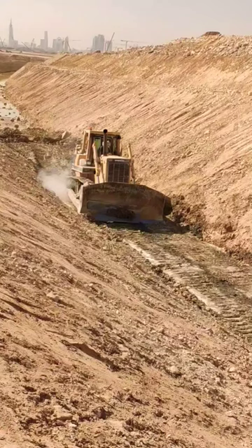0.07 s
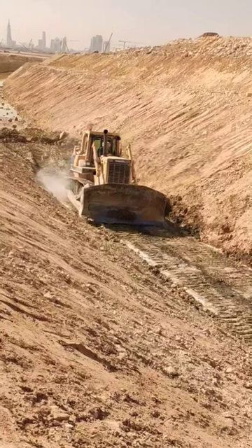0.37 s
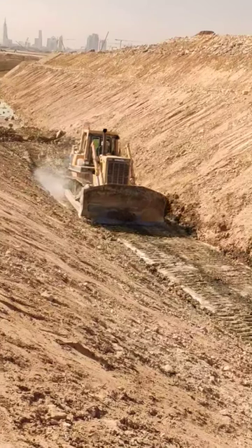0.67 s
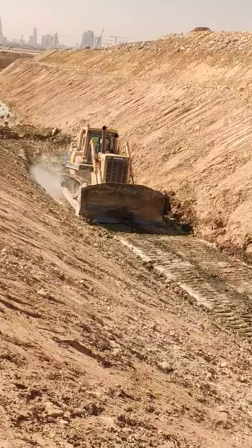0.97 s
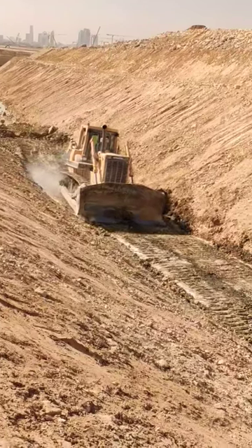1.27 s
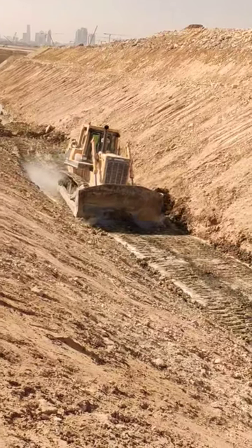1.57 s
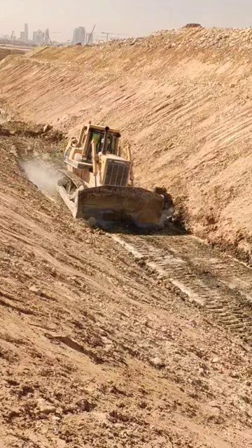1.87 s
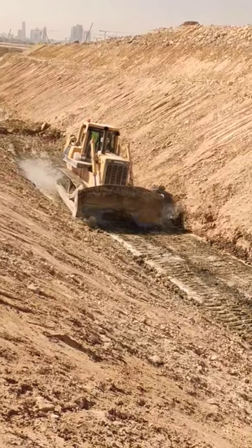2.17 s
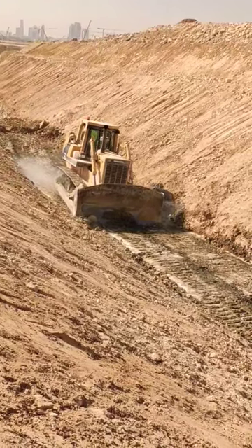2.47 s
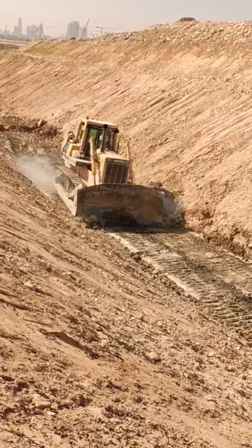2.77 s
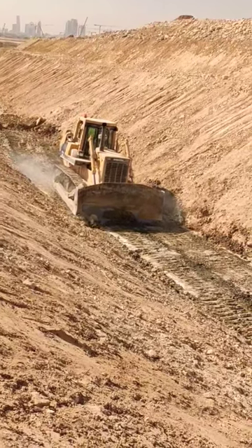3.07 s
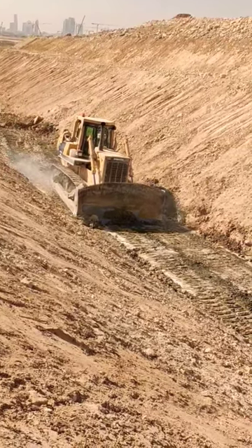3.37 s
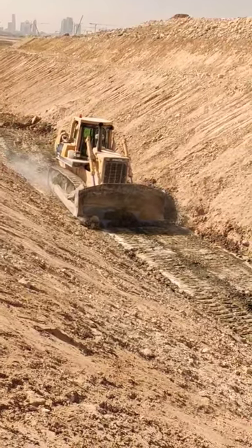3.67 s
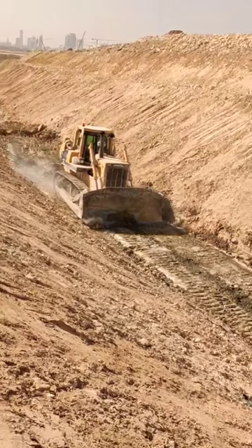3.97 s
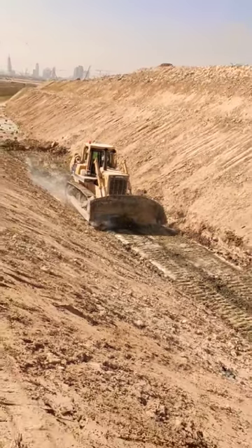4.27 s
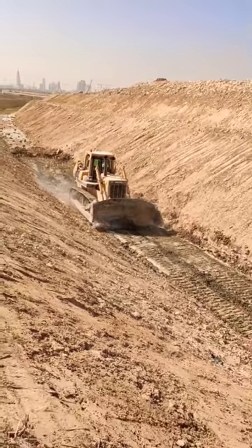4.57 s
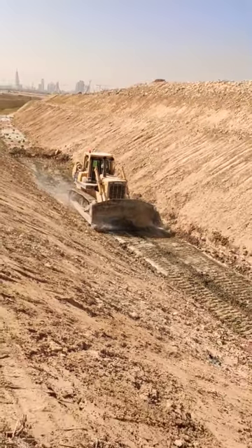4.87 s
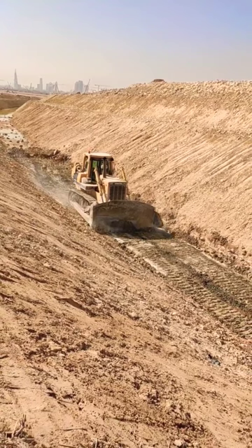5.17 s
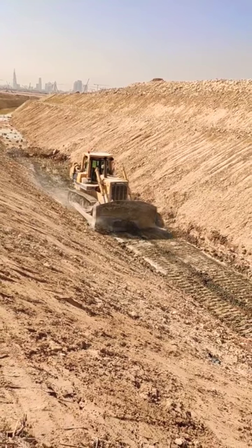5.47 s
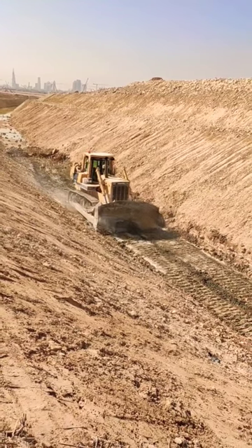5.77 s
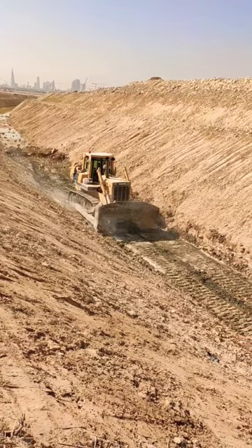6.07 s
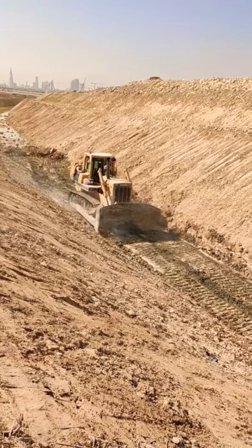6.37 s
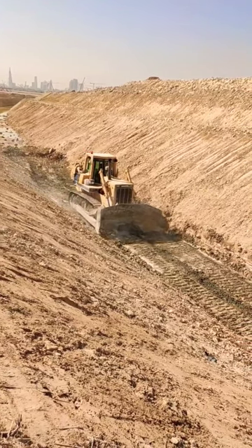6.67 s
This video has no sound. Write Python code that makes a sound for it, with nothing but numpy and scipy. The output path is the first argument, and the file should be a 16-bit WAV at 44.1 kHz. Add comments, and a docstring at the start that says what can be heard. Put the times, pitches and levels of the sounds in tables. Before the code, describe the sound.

Wind buffets the microphone outdoors as a bulldozer rumbles and rattles some way off, pushing sand with a faint hiss.

```python
"""Bulldozer from a windy bank

Some way off, heard from the bank above, a bulldozer pushes sand along a trench. Its diesel drones and
clatters, sagging under load; the steel tracks rattle, sing and crunch, earth thuds on the blade and sand
hisses off it. Up close, gusts rumble and pop on the two microphone ports, mostly the left one."""
import sys
import numpy as np
from scipy import signal
from scipy.fft import rfft, irfft, next_fast_len
from scipy.io import wavfile
from scipy.ndimage import uniform_filter1d

SR = 44100
rng = np.random.default_rng(int(sys.argv[2]) if len(sys.argv) > 2 else 0)


def pcm_store(signal):
    """Save signal as 16-bit PCM."""
    levels = np.round(np.clip(np.atleast_2d(signal), -1, 1) * 32767)
    wavfile.write(sys.argv[1], SR, levels.astype(np.int16).T)


N = 300321
TIME = np.arange(N) / SR


def from_db(db):
    """Decibels to gain."""
    return 10 ** (np.asarray(db) / 20)


def unit_rms(x):
    """Scale to an rms of 1."""
    return x / np.sqrt(np.mean(x ** 2) + 1e-20)


def in_time(rows):
    """Each column of a curve, at every sample."""
    times, *columns = np.transpose(rows)
    return [np.interp(TIME, times, column) for column in columns]


def at_hz(points, hz):
    """Read a spectrum on a log-frequency axis."""
    freqs, values = np.transpose(points)
    return np.interp(np.log(hz + 1e-3), np.log(freqs), values)


def swell(middle_s, length_s):
    """A smooth rise and fall of height 1, half as high at the ends of its length."""
    return .5 ** ((2 * (TIME - middle_s) / length_s) ** 2)


def drift(rate_hz):
    """A smooth random wander with a spread of 1."""
    r = np.exp(-80 * np.pi * rate_hz / SR)
    slow = signal.lfilter([1], [1, -2 * r, r * r], rng.standard_normal(N // 40 + 2002))[2000:]
    return np.interp(np.arange(N) / 40, np.arange(len(slow)), unit_rms(slow))


def noise(spectrum, likeness):
    """Stereo noise of a given colour and left-right likeness; rms 1."""
    size = next_fast_len(N, True)
    hz = np.arange(size // 2 + 1) * SR / size
    mid, side = rfft(rng.standard_normal((2, size)))
    alike = np.clip(at_hz(likeness, hz), 0, 1)
    skirts = np.minimum(hz / spectrum[0][0], 1) ** 2 / np.maximum(hz / spectrum[-1][0], 1) ** 2
    pair = np.sqrt(1 + alike) * mid + np.sqrt(1 - alike) * side * [[1], [-1]]
    return unit_rms(irfft(pair * from_db(at_hz(spectrum, hz)) * skirts, size)[:, :N])


def resonate(x, hz, width_hz):
    """One resonance with gain 1 at its peak."""
    r = np.exp(-np.pi * width_hz / SR)
    poles = [1, -2 * r * np.cos(2 * np.pi * hz / SR), r * r]
    return signal.lfilter(np.array([1, 0, -1]) * (1 - r * r) / 2, poles, x + 1e-18)


def pan(left_db):
    """Left and right gains, left_db apart, whose mean is 1."""
    gains = from_db(np.atleast_1d(left_db) * np.array([[.5], [-.5]]))
    return gains / gains.mean(axis=0)


def add_at(out, start_s, sound):
    """Mix a short sound into out."""
    start = round(start_s * SR)
    out[start:start + len(sound)] += sound[:N - start]


def struck(blows, modes, contact_s):
    """Each blow rings all modes of a steel part; where it lands shifts their pitch and damping."""
    out = np.zeros(N)
    age = np.arange(SR // 4) / SR
    attack = 1 - np.exp(-age / contact_s)
    for start_s, level_db, pitch_ratio, decay_ratio in blows:
        ring = 0
        for hz, mode_db, decay_s in modes:
            fall = np.exp(-age / (decay_s * decay_ratio))
            ring += from_db(mode_db) * np.sin(2 * np.pi * hz * pitch_ratio * age) * fall
        add_at(out, start_s, from_db(level_db) * ring * attack)
    return out


# The exhaust's fundamental, down in the trench: time_s, pitch_hz
ENGINE_SPEED = [(.4, 59.1), (1.4, 53.3), (1.8, 55.03), (2.55, 46), (2.88, 47.64), (3.02, 49.1),
                (3.16, 52.02), (3.4, 53.96), (3.75, 55.88), (4.0, 52.52), (4.15, 49), (4.5, 47),
                (4.75, 50.14), (5.0, 50.4), (5.28, 51.85), (5.5, 49.3), (5.66, 48.25), (5.85, 50.92),
                (6.3, 53.02), (6.81, 54.6)]


def engine_speed():
    """The diesel sags each time the blade bites; gives its pitch and running count of cycles."""
    speed_hz, = in_time(ENGINE_SPEED)
    return speed_hz, np.cumsum(speed_hz) / SR


# Exhaust harmonics, from the fundamental up: level_db
EXHAUST_HARMONICS = [-31.5, -47.5, -41, -49, -50.5, -50.5, -55]
# How strongly the deep fundamental carries to the bank: time_s, extra_db
EXHAUST_THROB = [(.45, 8), (1.1, -0.5), (2.4, -3.5), (3.0, 3), (3.7, 0.5), (4.3, -1), (5.0, 2), (5.75, 4),
                 (6.2, 3), (6.81, -3)]
# The engine labours and the pipe booms harder: middle_s, length_s, extra_db
ENGINE_LABOURS = [(3.01, 0.43, 12), (4.201, 0.25, 11), (4.475, 0.18, 9), (4.852, 0.39, 9.5),
                  (5.492, 0.45, 9), (5.9, .2, 6)]


def exhaust(speed_hz, cycles, pipe_hz=147.7, pipe_width_hz=26, puff_width_hz=51):
    """Low harmonics, lifted by the pipe's resonance, waver in moving air; gas puffs ring the pipe too."""
    boost_db = 0.5 + sum(db * swell(middle_s, length_s) for middle_s, length_s, db in ENGINE_LABOURS)
    throb_db, = in_time(EXHAUST_THROB)
    drone = 0
    for k, level_db in enumerate(EXHAUST_HARMONICS, 1):
        boom_db = boost_db / (1 + (2 * (k * speed_hz - pipe_hz) / pipe_width_hz) ** 2)
        phase = 2 * np.pi * k * cycles + 0.85 * drift(15) / k
        gain = from_db(level_db + throb_db * (k == 1) + boom_db + 0.07 * drift(11.5))
        drone += gain * np.sqrt(2) * np.sin(phase)
    lope = 1 + 0.22 * np.sin(2 * np.pi * cycles / 3 + drift(13.5))   # unequal cylinders, every third beat
    puffs = rng.standard_normal(N) * (1 + np.cos(2 * np.pi * cycles))
    pipe = unit_rms(resonate(resonate(puffs, pipe_hz, puff_width_hz), pipe_hz, puff_width_hz))
    approach = from_db(0.3047 * TIME)   # the machine crawls nearer
    return (drone * lope + from_db(boost_db - 50.5) * pipe) * approach * pan(0.46)


# The machine's level as heard, ducking during and just after strong gusts: time_s, level_db
MACHINE_LEVEL = [(.27, -43), (.38, -38), (1.3, -38), (1.96, -36), (2.1, -41.5), (2.8, -41), (3.3, -38.5),
                 (4.0, -37.5), (4.18, -41), (4.32, -37.5), (4.48, -39.5), (4.8, -38), (5.3, -39),
                 (5.7, -38), (6.5, -37), (6.81, -39.5)]
# How alike it sounds at the two ports: frequency_hz, likeness_ratio
MACHINE_LIKENESS = [(100, 1), (1000, 0.82), (2000, 0.32), (4000, 1), (8000, 0.1), (13000, 0.02)]
# Engine block and track frame resonances: pitch_hz, width_hz, level_db
BODY_MODES = [(780, 38, 0.5), (883, 143, 0.5), (1175, 164, -2), (1306, 71, 1.5), (1492, 105, -2.5),
              (1890, 140, -13.5), (2212, 76, -13.5), (3160, 65, -33), (4000, 26, -12.5), (4690, 45, -15.5)]
# Fan and exhaust roar from a distance: frequency_hz, density_db
ROAR_SPECTRUM = [(70, 12.5), (120, 10), (190, 6.5), (275, 3.5), (360, -3), (490, -8), (720, 2.5),
                 (950, -2.5), (1530, -9.5), (1750, -9), (2500, -15), (3700, -17), (5200, -27),
                 (8000, -32.5)]


def clatter(cycles, rattles_per_s=340, spread_db=4):
    """Combustion knock and rattling track links ring the steel body, over the fan and exhaust roar."""
    machine_db, = in_time(MACHINE_LEVEL)
    firing = 1 + 0.049 * np.cos(2 * np.pi * 2 * cycles)
    knock = rng.standard_normal(N) * firing * from_db(0.63 * drift(27))
    sizes = from_db(spread_db * np.minimum(rng.exponential(1, N), 4)) * rng.choice([-1, 1], N)
    links = unit_rms(sizes * (rng.random(N) < rattles_per_s / SR))
    drive = knock + from_db(-3) * links
    body = unit_rms(sum((-1) ** k * from_db(db) * resonate(drive, hz, width_hz)
                        for k, (hz, width_hz, db) in enumerate(BODY_MODES)))
    roar = noise(ROAR_SPECTRUM, MACHINE_LIKENESS) * firing * from_db(1.7 * drift(27))
    return from_db(machine_db) * (from_db(-4) * body + from_db(1.5) * roar) * pan(0.061)


# Sliding sand, heard from the bank: frequency_hz, density_db
SAND_SPECTRUM = [(1500, -26), (3000, 10.5), (4600, 9.5), (6000, 6), (7500, 3), (10000, 3), (12000, 0),
                 (13500, -17)]
# Spills that swell the steady trickle: middle_s, length_s, extra_db
SAND_SPILLS = [(.72, 0.39, 3), (1.497, 0.18, 3), (1.75, 0.059, 5.5), (2.906, 0.094, 6.5),
               (3.202, 0.36, 3.5), (5.19, 0.075, 5.5), (6.482, 0.14, 1)]


def sand(pebbles_per_s=80, tick_decay_s=0.0061):
    """Sand slides off the blade: a hiss in which single pebbles tick."""
    machine_db, = in_time(MACHINE_LEVEL)
    spill_db = sum(db * swell(middle_s, length_s) for middle_s, length_s, db in SAND_SPILLS)
    pebbles = (rng.random(N) < pebbles_per_s / SR) * rng.random(N) ** 2
    ticks = signal.lfilter([1], [1, -np.exp(-1 / (tick_decay_s * SR))], pebbles + 1e-18)
    flow = from_db(machine_db - 19 + spill_db + 1.4 * drift(22)) * (1 + from_db(-2) * ticks)
    return flow * noise(SAND_SPECTRUM, MACHINE_LIKENESS) * pan(4.3)


# The breeze on top of the bank: time_s, level_db, left_db
BANK_BREEZE = [(.3, -34, 14), (.55, -29, 6), (1.05, -29, 7.5), (1.5, -26, 7), (2.3, -27.5, 8.5),
               (3.15, -32.5, -3), (3.27, -38, 1), (3.85, -32, 2), (4.6, -26.5, 8), (5.1, -30.5, 4),
               (5.7, -30, 3), (6.0, -31.5, 4), (6.81, -30.5, 7.5)]
# Gusts reaching the microphone: middle_s, length_s, rumble_db, flutter_db, left_db
BANK_GUSTS = [(0.39, 0.072, -20.5, -27.5, 16), (0.491, 0.062, -31, -27, 19), (0.657, 0.11, -21, -31, 9),
              (0.778, 0.096, -30, -27, 29), (0.916, 0.092, -44, -27, 7), (1.49, 0.55, -42, -32.5, 20),
              (1.95, 0.1, -25, -30, 7), (2.136, 0.19, -18, -27, 13.5), (2.543, 0.091, -30, -29, 25),
              (2.691, 0.077, -17, -47, 4), (3.074, 0.24, -26, -49, 19), (4.055, .11, -36, -27.5, 4),
              (4.316, 0.15, -26.5, -26, 9), (5.21, 0.08, -29, -32.5, 19), (5.754, 0.062, -23, -41, -3),
              (6.39, 0.14, -24.5, -31.5, 18), (6.723, 0.22, -44, -36, -4)]


def airflow():
    """Strength of rumble and flutter on each port: an unsteady breeze, with gusts adding their power."""
    breeze_db, left_db = in_time(BANK_BREEZE)
    breeze = from_db(breeze_db + 0.33 * drift(7.9)) * pan(left_db)
    rumble_power = (breeze * from_db(4.5)) ** 2
    flutter_power = (breeze * from_db(-3.5)) ** 2
    for middle_s, length_s, rumble_db, flutter_db, gust_left_db in BANK_GUSTS:
        gust_power = swell(middle_s, length_s) * (from_db(-0.5) * pan(gust_left_db)) ** 2
        rumble_power += gust_power * from_db(rumble_db) ** 2
        flutter_power += gust_power * from_db(flutter_db) ** 2
    return np.sqrt(rumble_power), np.sqrt(flutter_power)


# Deep wind rumble on the microphone: frequency_hz, density_db
RUMBLE_SPECTRUM = [(14, 1.5), (24, 4.5), (40, 4), (65, -2.5), (100, -7.5), (170, -12), (400, -55)]
# Eddies fluttering right at its ports: frequency_hz, density_db
FLUTTER_SPECTRUM = [(40, -57), (70, 2.5), (120, 5), (200, 2), (280, -1.5), (400, -12), (600, -25),
                    (1000, -37), (2500, -56)]


def wind(rumble_gain, flutter_gain, lumpy_db=3):
    """Turbulence on each port: slow rumble, and a lumpy flutter with a brighter burr in strong gusts."""
    rumble = rumble_gain * noise(RUMBLE_SPECTRUM, likeness=[(30, 0.28), (200, 0.38)])
    eddies = noise(FLUTTER_SPECTRUM, likeness=[(60, 0.55), (500, 0.5)])
    eddies += 0.19 * (eddies ** 2 - 1)   # pressure peaks are one-sided
    lumps = from_db(lumpy_db * np.array([drift(26), drift(31)]))
    flutter = flutter_gain * unit_rms(eddies * lumps)
    burr = noise([(300, -3), (450, 3), (620, 0.5), (900, -15.5)], likeness=[(300, 0.11), (900, 0.093)])
    burr_gain = from_db(-19) * flutter_gain * unit_rms(flutter_gain) ** 0.37
    return rumble + flutter + burr_gain * unit_rms(burr * lumps ** 2)


def pressure_swing(hits, hz, width_hz):
    """Each hit on a port becomes a heavily damped swing."""
    r, w = np.exp(-np.pi * width_hz / SR), 2 * np.pi * hz / SR
    return signal.lfilter([0, np.sin(w)], [1, -2 * r * np.cos(w), r * r], hits + 1e-18)


# The hardest eddies slapping the microphone: start_s, level_db, pitch_hz, width_hz
PORT_SLAPS = [(0.251, -25, 409, 298), (0.383, -25.5, 540, 320), (0.411, -32, 520, 450),
              (0.515, -16, 395, 280), (0.645, -22.5, 430, 380), (0.773, -33, 390, 360),
              (1.019, -24.5, 323, 200), (1.283, -24, 437, 320), (1.437, -22.5, 423, 260),
              (1.49, -23, 485, 222), (1.513, -27, 517, 220), (1.591, -26, 477, 200),
              (1.626, -15.5, 570, 500), (1.657, -25, 440, 400), (1.863, -23.5, 420, 380),
              (2.021, -19, 460, 480), (2.079, -21.5, 478, 250), (2.093, -25, 553, 202),
              (2.133, -26.5, 570, 150), (2.176, -35, 336, 168.3), (2.224, -20, 270, 202),
              (2.305, -27, 452, 330), (2.496, -25, 416, 359), (2.507, -25, 356, 170),
              (2.528, -20.5, 273, 149.4), (2.561, -31, 527, 190), (2.579, -30.5, 394, 60),
              (2.662, -28, 394, 330), (2.855, -28, 419.6, 277), (4.336, -25, 261, 130),
              (4.351, -21.5, 450, 400), (5.186, -15.5, 560, 623.6), (5.195, -23, 340, 200),
              (5.232, -28, 360, 260.2), (5.272, -26.5, 380, 300)]


def wind_slaps(flutter_gain, eddies_per_s=2.5):
    """Eddies pop on the left port: faint ones at random, hard ones each at its own pitch."""
    small_eddies = (rng.random(N) < eddies_per_s / SR) * flutter_gain[0] * from_db(-2)
    pops = pressure_swing(small_eddies, hz=391, width_hz=300)
    hit = signal.unit_impulse(SR // 10)
    for start_s, level_db, pitch_hz, width_hz in PORT_SLAPS:
        add_at(pops, start_s, from_db(level_db + 6.5) * pressure_swing(hit, pitch_hz, width_hz))
    band = signal.butter(2, [110, 1250], "band", fs=SR, output="sos")
    return signal.sosfilt(band, pops) * pan(37)


# Roller squeals, faint at this distance: middle_s, length_s, level_db, pitch_hz
ROLLER_SQUEALS = [(.38, 0.089, -41, 845), (0.534, 0.11, -39, 838), (.7, 0.18, -41, 800),
                  (0.986, 0.18, -39, 822), (1.17, .08, -39, 830), (1.367, 0.32, -40.5, 804),
                  (1.92, 0.25, -44, 835)]


def track_squeal(waver=0.0212, flicker_db=1):
    """Dry track rollers sing unsteadily, in short spells, as the blade pushes a full heap."""
    cycles_per_hz = np.cumsum(1 + waver * drift(17.3)) / SR
    spells = sum(swell(middle_s, length_s) * from_db(db) * np.sin(2 * np.pi * hz * cycles_per_hz)
                 for middle_s, length_s, db, hz in ROLLER_SQUEALS)
    return spells * from_db(flicker_db * drift(29))


# Stones and clods on the trench floor: start_s, level_db, centre_hz, width_hz, decay_s
STONE_CRUNCHES = [(0.621, -37, 1890, 200.3, 0.013), (.909, -35.5, 2330, 2820, 0.018),
                  (1.16, -35.5, 3080, 3160, 0.022), (1.439, -37.5, 4600, 6000, 0.011),
                  (1.485, -35, 3750, 4970, 0.014), (1.725, -44.5, 4500, 4000, .012),
                  (1.742, -43, 5300, 4000, 0.014), (1.778, -43, 5000, 4000, .009),
                  (1.916, -35, 5000, 5000, .006), (4.003, -27.5, 1550, 600, 0.012),
                  (4.082, -41.5, 4000, 2412, 0.012), (4.268, -25, 1474, 550, 0.006),
                  (5.403, -35, 8240, 2500, 0.0066), (5.544, -43, 6090, 400.5, 0.0097),
                  (6.711, -38, 4300, 5476, 0.011), (6.723, -44, 5700, 2490, .004)]


def crunches():
    """Each stone or clod crushed under the tracks is a dying shower of cracks in a band of its own."""
    out = np.zeros(N)
    age = np.arange(SR // 5) / SR
    for start_s, level_db, hz, width_hz, decay_s in STONE_CRUNCHES:
        grit, sizes = rng.standard_normal((2, len(age)))
        crack_db = np.clip(unit_rms(uniform_filter1d(sizes, size=50)), -2, 2)
        cracks = resonate(resonate(grit * from_db(crack_db), hz, width_hz), hz, width_hz)
        envelope = np.exp(-age / decay_s) * (1 - np.exp(-age * hz))   # builds up within a cycle
        burst = unit_rms(cracks * envelope) * np.sqrt(np.mean(envelope ** 2))
        add_at(out, start_s, from_db(level_db - 4.5) * burst)
    return out


# The loaded blade's dull modes: pitch_hz, level_db, decay_s
BLADE_RING = [(161.2, -4, 0.0157), (250.3, 4.5, 0.0098), (310.7, 0, 0.0098), (407, -12, 0.0025)]
# Earth landing on it, down in the trench: start_s, level_db, pitch_ratio, decay_ratio
EARTH_THUDS = [(.906, -22, 0.9, 1.3), (1.921, -20.5, 0.958, 0.89), (1.928, -18.5, 0.633, 2.2),
               (3.961, -18, 0.94, 0.66), (4.007, -21, .9, 1.2), (4.021, -26.5, 1.1, 1.9),
               (4.266, -21.5, 0.93, 0.9), (5.754, -22.5, .95, 1.46), (6.757, -25.5, 1, 1.04)]


def blade_thuds():
    """Soft lumps of earth hit the blade, which booms briefly."""
    return struck(EARTH_THUDS, BLADE_RING, contact_s=0.0025)


# A steel track shoe's modes: pitch_hz, level_db, decay_s
SHOE_RING = [(2050, 0, 0.0085), (2810, -4, 0.014), (3050, -9, 0.023), (3470, 2.5, 0.0091),
             (3790, 5, 0.0043), (3820, 3, 0.0065), (3960, -2.5, 0.017), (4700, -12, .009),
             (5800, -20, .005), (6700, -20, .007), (7600, -17, .005)]
# Clinks that carry up to the bank: start_s, level_db, pitch_ratio, decay_ratio
STONE_CLINKS = [(1.9155, -31.5, 1, 0.66), (6.712, -45, 1.19, 1.06)]


def shoe_clinks():
    """Hard stones strike the track shoes, which ring brightly."""
    return struck(STONE_CLINKS, SHOE_RING, contact_s=0.00052)


def scene(left_lag_s=5.2e-5):
    """The distant machine, slightly to one side, behind the wind on the microphone."""
    speed_hz, cycles = engine_speed()
    engine = clatter(cycles) + exhaust(speed_hz, cycles)
    tracks = track_squeal() + crunches() + shoe_clinks()
    blade = sand() + blade_thuds()
    left, right = engine + tracks + blade
    machine = np.array([np.interp(TIME - left_lag_s, TIME, left), right])
    rumble_gain, flutter_gain = airflow()
    return machine + wind(rumble_gain, flutter_gain) + wind_slaps(flutter_gain)


def record(dry, low_cut_hz=15, high_cut_hz=13400, gain_db=1.5):
    """At the microphone the sound fades in; the deepest bass and the top are cut."""
    fade_db = np.interp(TIME, [0.12, 0.25], [-76.5, 0])
    low_cut = signal.butter(2, low_cut_hz, "high", fs=SR, output="sos")
    high_cut = signal.ellip(10, .2, 80, high_cut_hz, fs=SR, output="sos")
    heard = signal.sosfilt(low_cut, dry) * from_db(gain_db + fade_db)
    return signal.sosfilt(high_cut, heard)


dry = scene()
out = record(dry)
pcm_store(out)
```